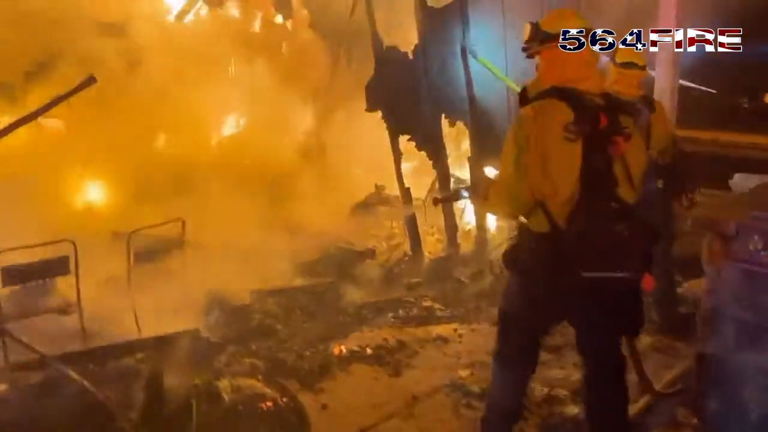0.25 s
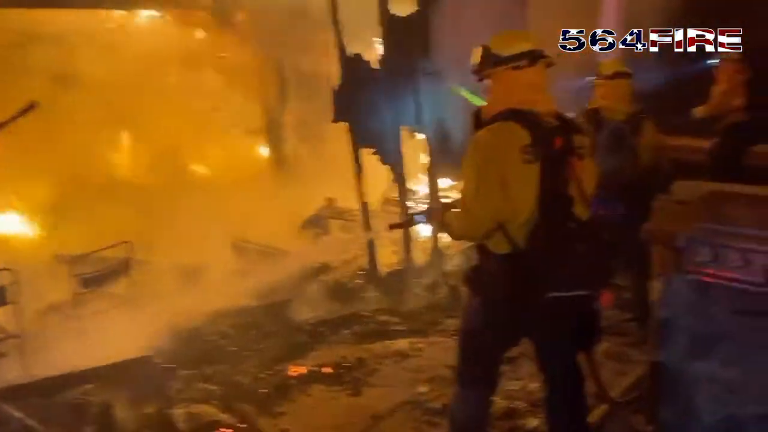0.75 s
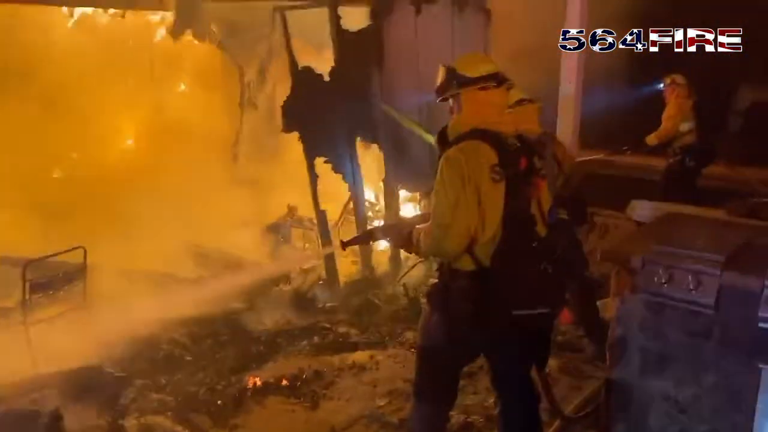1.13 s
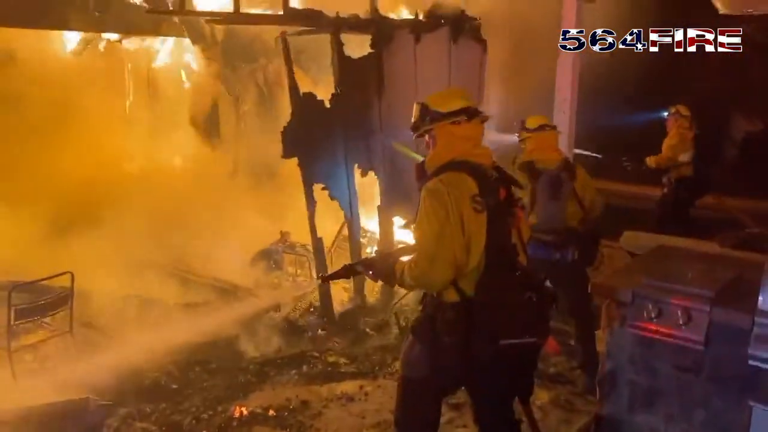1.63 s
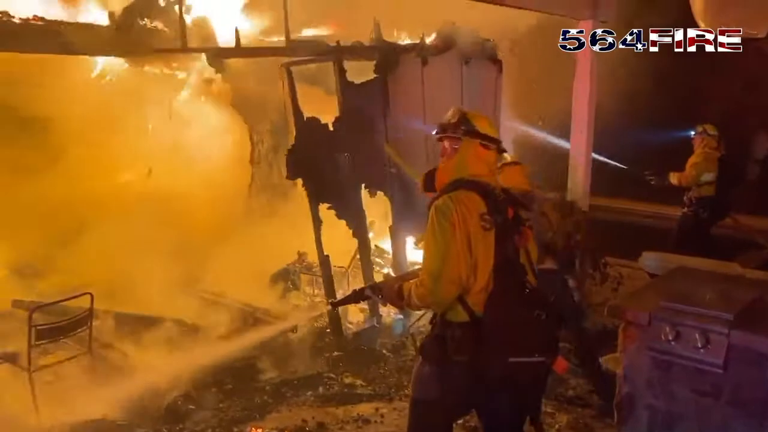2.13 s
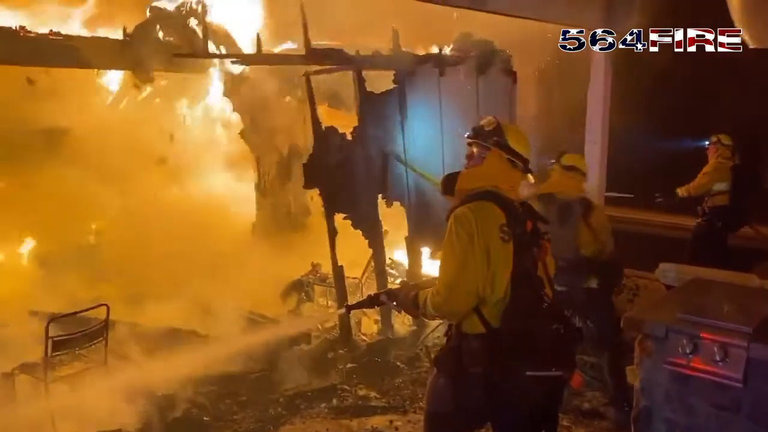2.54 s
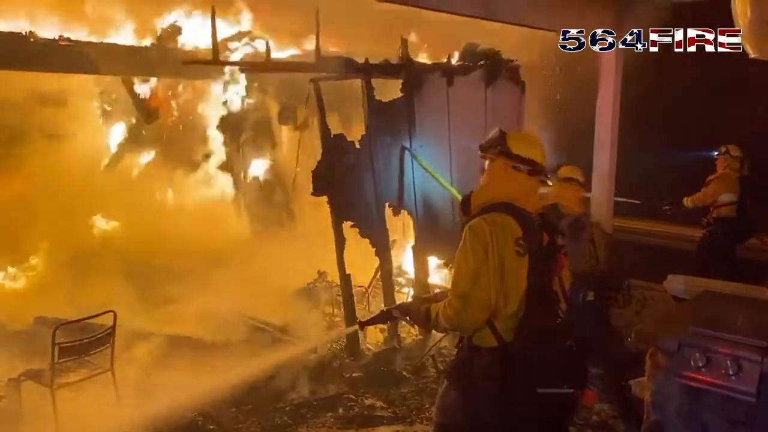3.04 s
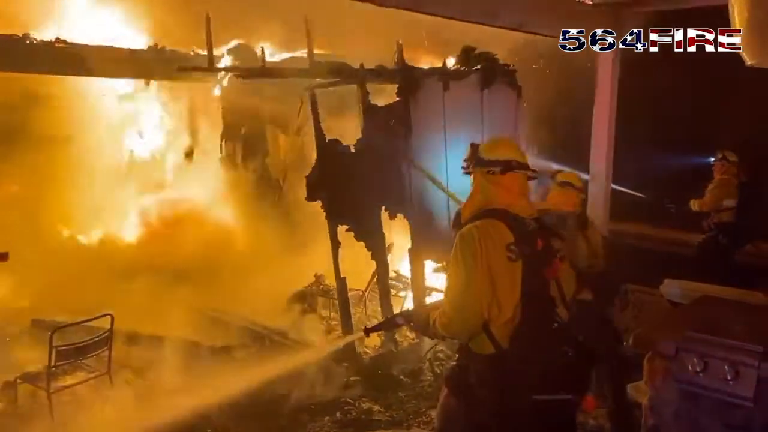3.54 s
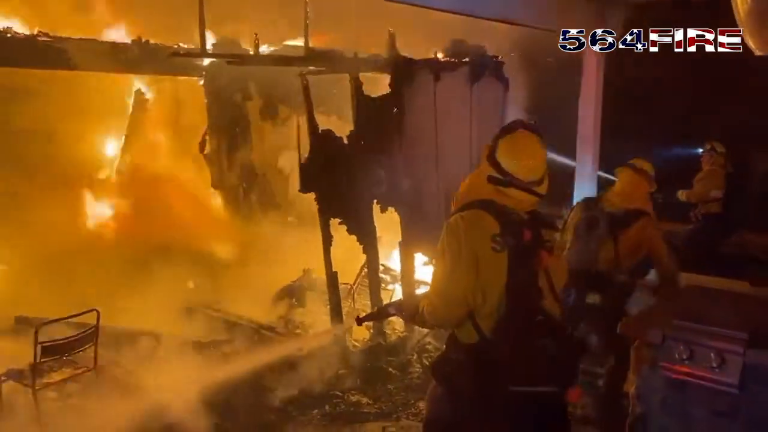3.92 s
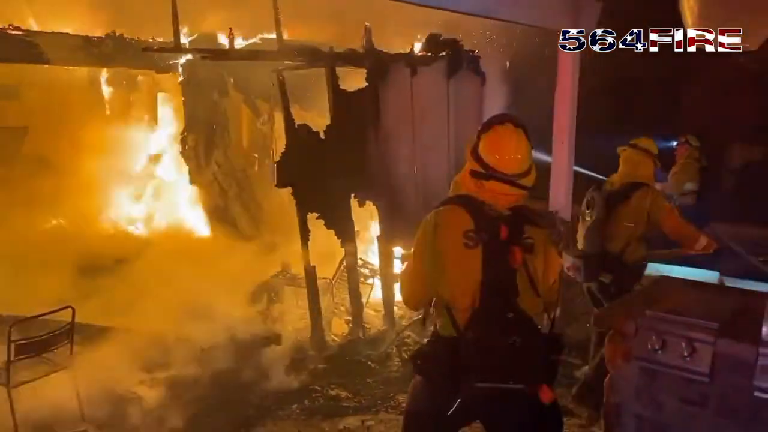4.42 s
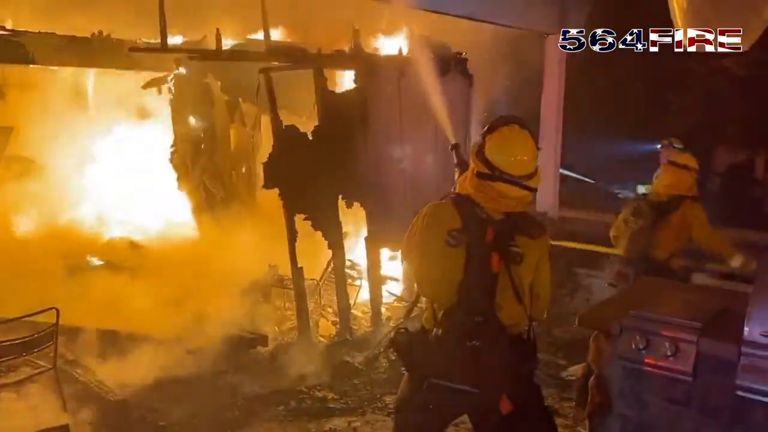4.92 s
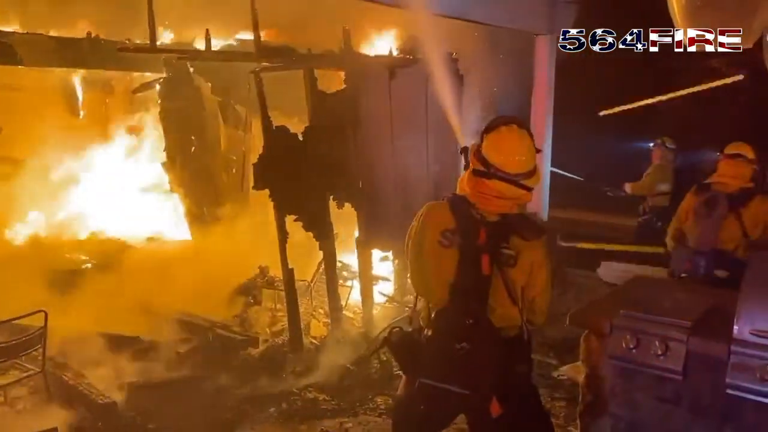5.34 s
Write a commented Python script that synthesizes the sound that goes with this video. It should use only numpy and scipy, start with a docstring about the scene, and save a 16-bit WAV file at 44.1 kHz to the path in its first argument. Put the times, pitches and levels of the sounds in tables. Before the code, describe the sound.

Sputtering water spray drums on a wall over rumbling, crackling fire and the steady drone of a distant pump engine.

```python
"""Fire hoses play on a burning building at night. From the start the near jet hisses at the nozzle,
spatters on debris and drums on a sheet wall, while flames roar and a small pump engine runs some way
off against a wash of farther hoses and fire. Big drops spit on hot debris and the fire crackles as the
jet is swung about. Near 3 s debris lands and tumbles; the jet surges, later drops away briefly, and
ends turned up at the roof. One microphone, band-limited."""
import sys
import numpy as np
from scipy import signal
from scipy.fft import rfft, irfft, next_fast_len
from scipy.io import wavfile
from scipy.ndimage import uniform_filter1d, map_coordinates

SR = 44100
rng = np.random.default_rng(int(sys.argv[2]) if len(sys.argv) > 2 else 0)


def generate_wav(signal):
    """Clip the signal to [-1, 1] and save it as 16-bit WAV at the path in sys.argv[1]."""
    frames = np.transpose(np.atleast_2d(signal))
    scaled = np.clip(frames, -1, 1) * 32767
    pcm = np.round(scaled).astype(np.int16)
    wavfile.write(sys.argv[1], SR, pcm)


N = 246078


def amp(db):
    """Gain of a level in dB."""
    return 10 ** (np.asarray(db) / 20)


def unit(x):
    """x at rms 1."""
    return x / np.sqrt(np.mean(x ** 2) + 1e-20)


def eq_gain(points, hz):
    """Gain of an EQ curve drawn through (freq_hz, level_db) points on a log axis."""
    freq_hz, level_db = np.transpose(points)
    return amp(np.interp(np.log(hz + 1), np.log(freq_hz + 1), level_db))


def automation(rows):
    """One per-sample curve for each column after the time."""
    time_s, *columns = np.transpose(rows)
    return [np.interp(np.arange(N) / SR, time_s, column) for column in columns]


def wobble(rate):
    """A smooth random curve, rate knots a second."""
    knots = rng.standard_normal(int(N * rate / SR) + 4)
    return map_coordinates(knots, [np.arange(N) * rate / SR])


def filtered(x, response):
    """x through a gain that depends on frequency."""
    size = next_fast_len(N + 8192)
    return irfft(rfft(x, size) * response(np.fft.rfftfreq(size, 1 / SR)), size)[..., :N]


def coloured(x, eq):
    """x shaped by an EQ curve that closes an octave past each end, at rms 1."""
    closed = [(eq[0][0] / 2, -120), *eq, (eq[-1][0] * 2, -120)]
    return unit(filtered(x, lambda hz: eq_gain(closed, hz)))


def water(patchy_db, drops_db):
    """White rush with patches of random gain, and single drops of very uneven size on top."""
    spectrum = signal.stft(rng.standard_normal(N), nperseg=512)[2]
    patches = uniform_filter1d(rng.standard_normal(spectrum.shape), size=8, axis=0)  # across frequency
    patches = uniform_filter1d(patches, size=5, axis=1)  # across time
    rush = signal.istft(spectrum * amp(patchy_db * unit(patches)), nperseg=512)[1][:N]
    drops = (rng.random(N) < 1500 / SR) * rng.standard_normal(N)  # about 1500 a second
    size_db = np.minimum(4 * rng.exponential(size=N), 8)
    return unit(rush) + amp(drops_db) * unit(drops * amp(size_db))


def bursts(rows, rise_cycles, decay_cycles):
    """Short pressure bursts: each a wave that swells and dies within a few cycles."""
    track, t = np.zeros(N + SR), np.arange(SR // 8) / SR
    for start_s, peak_db, pitch_hz in rows:
        cycles = pitch_hz * t - 2 * decay_cycles  # zero at the peak
        envelope = np.exp(-(cycles / np.where(cycles < 0, rise_cycles, decay_cycles)) ** 2)
        track[round(start_s * SR):][:len(t)] -= amp(peak_db) * envelope * np.cos(2 * np.pi * cycles)
    return track[:N]


# EQ of the hiss, the coarse spatter and the airy mist: freq_hz, relative_db
HISS_EQ = [(3600, -25.5), (4500, -2), (5700, 4.5), (6600, -0.5), (7500, -17.5), (8500, -45)]
SPATTER_EQ = [(2200, -6), (2700, -1.5), (3500, 0), (4300, -1.5), (5200, -12.5)]
MIST_EQ = [(6600, -1.5), (7500, 2), (8300, 4), (9000, 5.5), (9800, -22)]


def spray(spatter_db, mist_db):
    """The jet tears into drops: hiss, coarser spatter and fine mist."""
    torn = water(patchy_db=1.5, drops_db=-5.5)
    layers = [(0, HISS_EQ), (spatter_db, SPATTER_EQ), (mist_db, MIST_EQ)]
    return sum(amp(level_db) * coloured(torn, eq) for level_db, eq in layers)


# Midrange body of water drumming on the wall: freq_hz, relative_db
DRUM_EQ = [(450, -21), (650, -3), (800, 0), (1000, 1.5), (1300, 0.5), (1600, -1.5), (2200, -18.5)]


def drumming(drum_db, ring_db, ring_hz):
    """The jet drums on what it strikes and excites a hollow whose pitch shifts with the aim."""
    drum = coloured(water(patchy_db=1.6, drops_db=-4.5), DRUM_EQ)
    gush = np.array([water(patchy_db=1.0, drops_db=-8.5), water(patchy_db=0.51, drops_db=-5.5)])
    broad = unit(filtered(gush, lambda hz: 1 / np.sqrt(1 + (hz / 330) ** 3)))
    narrow = unit(filtered(gush, lambda hz: 1 / (1 + (hz / 210) ** 2)))
    focus = np.clip((ring_db + 29) / 12, 0, 0.5)  # a direct, loud hit rings more purely
    swell = (1 - focus) * broad + focus * narrow
    phase = 2 * np.pi * np.cumsum(ring_hz) / SR
    ring = swell[0] * np.cos(phase) + swell[1] * np.sin(phase)  # slow noise on the moving pitch
    return amp(drum_db) * drum + amp(ring_db) * ring


# Fader ride of the near jet: time_s, level_db
JET_FADER = [(0.0, -29.5), (0.1, -30.5), (0.16, -29.5), (0.19, -27.5), (0.24, -32), (0.31, -32),
             (0.42, -31.5), (0.49, -29.5), (0.54, -30), (0.6, -34), (0.635, -32.5), (0.655, -28.5),
             (0.71, -34.5), (0.73, -28.5), (0.79, -33), (1.0, -32.5), (1.33, -35), (1.44, -29),
             (1.58, -23.5), (1.66, -25.5), (1.74, -25), (2.1, -25), (2.2, -26), (2.4, -23), (2.53, -27),
             (2.62, -35), (2.8, -36), (2.95, -38), (3.1, -35.5), (3.2, -33), (3.3, -32), (3.4, -29.5),
             (3.5, -26.5), (3.56, -25.5), (3.59, -23.5), (3.615, -24), (3.645, -19), (3.67, -21.5),
             (3.69, -24), (3.73, -35), (3.85, -34), (4.0, -35), (4.08, -31), (4.16, -31.5), (4.21, -28),
             (4.3, -32), (4.44, -33.5), (4.58, -47.5), (4.805, -49), (4.812, -41), (4.824, -47),
             (4.83, -38.5), (4.85, -37), (4.92, -37), (4.98, -43), (5.06, -37), (5.32, -39), (5.58, -37.5)]
# Mix at each aim, relative to that fader: start_s, drum_db, ring_db, ring_hz, spatter_db, mist_db
NOZZLE_AIMS = [(0.0, 1.5, -1.5, 1950, -8.5, -4), (0.95, 3, 2, 1965, -7, -4), (1.409, -3, -2, 2030, -1, -9),
               (1.53, -4, 1.5, 2120, -2, -6.5), (1.65, -4, -2, 2090, -1.5, -5.5),
               (2.049, -8, -4, 2017, -3, -6.5), (2.581, 0.5, -1.5, 1930, -4.5, -7.5),
               (2.9, 1, 1, 1904, -6.5, -6), (3.15, -1, 1, 1874, -7.5, -6), (3.33, -3.5, 7, 1838, -10, -8),
               (3.43, 2.5, 3.5, 1900, -9, -11), (3.48, -2, 3, 1900, -7, -14),
               (3.52, 1, 0.5, 1830, -9.5, -10), (3.6, -2, -2, 1860, -8, -11),
               (3.67, -0.5, 0.5, 1680, -11, -11), (3.72, -0.5, -2, 1855, -11.5, -7.5),
               (4.03, -2.5, 0, 1783, -15, -9.5), (4.18, -4.5, -2, 1852, -18, -6.5),
               (4.27, -3, -19, 1880, -13, -6), (4.54, 8.5, -8, 1897, -17, 0), (4.815, 7, -2, 1967, -1, 7.5),
               (4.85, 3, 6, 1960, -1, 2.5), (4.88, 7, 4, 1900, 1, 3), (4.91, 0, 2, 1960, 1, 3.5),
               (4.94, 4.5, -6, 1980, -5, 2)]
SWING_S = 0.031  # glide from one aim to the next


def near_hose(sputter):
    """The nozzle swings from aim to aim; air in the hose makes spray and landing water sputter as one."""
    jet_db, = automation(JET_FADER)
    start_s, *columns = np.transpose(NOZZLE_AIMS)
    aim = np.maximum(np.searchsorted(start_s, np.arange(N) / SR, side="right") - 1, 0)
    drum_db, ring_db, ring_hz, spatter_db, mist_db = [
        uniform_filter1d(column[aim], size=round(SWING_S * SR), mode="nearest") for column in columns]
    landing = drumming(jet_db + drum_db, jet_db + ring_db, ring_hz)
    nozzle = amp(jet_db) * spray(spatter_db, mist_db)
    return amp(0.67 * sputter) * landing + amp(0.75 * sputter) * nozzle


# Fader rides of the fire's roar: time_s, rumble_db, flutter_db
FLAME_FADERS = [(0.0, -27.5, -25.5), (0.45, -27, -22.5), (0.75, -25, -21.5), (1.1, -25.5, -24),
                (1.3, -33, -22), (1.5, -25.5, -24), (1.65, -23.5, -23.5), (1.9, -22.5, -23),
                (1.98, -28, -24.5), (2.07, -27, -24), (2.15, -28, -30.5), (2.5, -30, -36), (2.7, -29, -31),
                (3.4, -28.5, -29.5), (3.62, -21.5, -25.5), (3.78, -29, -32.5), (4.0, -34.5, -28),
                (4.35, -34, -29.5), (4.75, -27, -29), (5.15, -31.5, -36.5), (5.35, -26, -30.5),
                (5.58, -33, -28.5)]
# EQ of the deep rumble and the low-mid flutter: freq_hz, relative_db
RUMBLE_EQ = [(13, -41), (22, -18), (42, -19), (59, -6.5), (90, -5.5), (173, -11.5), (210, -19.5),
             (220, -14), (290, -22.5), (480, -120)]
FLUTTER_EQ = [(76, -33), (130, -2.5), (178, 0.5), (210, -5), (252, -0.5), (410, -5.5), (590, -11.5),
              (800, -18.5), (1040, -38), (1760, -120)]


def flames():
    """Turbulent burning: a churning rumble under a lighter flutter."""
    rumble_db, flutter_db = automation(FLAME_FADERS)
    rumble = unit(amp(0.31 * wobble(6.7)) * coloured(rng.standard_normal(N), RUMBLE_EQ))
    flutter = unit(amp(0.72 * wobble(12)) * coloured(rng.standard_normal(N), FLUTTER_EQ))
    return amp(rumble_db) * rumble + amp(flutter_db) * flutter


# The engine hunts, ahead of or behind a steady beat: time_s, lead_s
ENGINE_TIMING = [(0.2, 0.014), (0.45, 0.0048), (0.7, 0.0009), (0.95, 0.0008), (1.2, 0.01), (4.2, 0.017),
                 (4.45, 0.002), (4.61, 0.00013), (4.85, -0.00074), (5.2, 0.004)]
# How loud the engine comes across: time_s, valve_db, exhaust_trim_db
ENGINE_FADERS = [(0, -38, -1), (0.5, -35, 0), (0.85, -34.5, 2), (1.1, -34, 0.5), (1.7, -34.5, 1.5),
                 (2.3, -46, -3.5), (3, -50, -1), (4, -47, -4), (4.4, -39, -0.5), (4.7, -37, -1.5),
                 (5.1, -36.5, -1), (5.58, -50, -4)]
# Partials of the exhaust drone, before the trim: shaft_multiple, level_db
EXHAUST_PARTIALS = [(1, -35), (1.5, -41.5), (2, -36.5), (2.5, -44.5), (3, -39.5), (4.5, -42), (5, -47),
                    (6, -48)]
# Fader ride of the hum: time_s, level_db
HUM_FADER = [(0, -35), (0.8, -32), (1.3, -38.5), (1.8, -35), (2.3, -40.5), (3.3, -35), (3.8, -39.5),
             (4.3, -35.5), (5.58, -36.5)]
# EQ of the valve rattle: freq_hz, relative_db
VALVE_EQ = [(600, -4), (1200, 0), (2000, 0), (2500, -1), (3000, -2), (3500, -7), (4200, -14), (6000, -12)]
SHAFT_HZ, HUM_HZ = 60.17, 240.8
FIRING_S = 4.6105  # one firing, which anchors the beat


def pump_engine():
    """A four-stroke single: exhaust drone, a hum, and valves rattling at each firing and a turn later."""
    t = np.arange(N) / SR - FIRING_S
    lead_s, = automation(ENGINE_TIMING)
    valve_db, trim_db = automation(ENGINE_FADERS)
    shaft = 2 * np.pi * SHAFT_HZ * (t + lead_s)
    exhaust = np.zeros(N)
    for multiple, level_db in EXHAUST_PARTIALS:
        gain = np.sqrt(2) * amp(level_db + trim_db + 3.0 * wobble(5))
        exhaust += gain * np.sin(multiple * shaft + 2 * np.pi * rng.random() + 0.4 * wobble(5.4))
    hum_db, = automation(HUM_FADER)
    hum_gain = np.sqrt(2) * amp(hum_db + 1.6 * wobble(5))
    hum = hum_gain * np.sin(2 * np.pi * HUM_HZ * t + 0.4 * wobble(3))
    cam = shaft / 2 + np.pi * SHAFT_HZ * 0.0008 * wobble(30)  # half speed, about 0.8 ms of jitter
    firing, offbeat = np.exp(3.5 * (np.cos([cam, cam + np.pi]) - 1))  # pulses several ms wide
    ticks = (firing + 0.3 * offbeat) * amp(1.5 * wobble(30))
    rattle = unit(ticks * coloured(rng.standard_normal(N), VALVE_EQ))
    return exhaust + hum + amp(valve_db) * rattle


# EQ of the background bed: freq_hz, relative_db
DISTANT_EQ = [(18, -47), (30, -7), (69, 2), (247, -8), (532, -5), (614, -9), (1090, -13.5), (2030, -8.5),
              (2800, -14), (3790, -23.5), (5840, -23), (7780, -22), (8560, -24.5), (9200, -47.5),
              (12000, -52), (20200, -120)]
DISTANT_DB = -28


def distant_wash():
    """Farther hoses and fire blur into one steady bed."""
    return amp(DISTANT_DB) * coloured(water(patchy_db=1.43, drops_db=-20.0), DISTANT_EQ)


# Bright spits of water: start_s, peak_db, pitch_hz
SPIT_HITS = [(0.1101, -16, 4330), (0.2623, -16, 5920), (0.3611, -12, 5520), (0.824, -14, 5623),
             (1.3987, -13, 4620), (3.1246, -20, 6240), (3.4467, -12, 4700), (4.2378, -15, 5820),
             (4.366, -24, 6620), (4.3954, -17, 5600), (4.811, -19, 3046), (4.8274, -20, 7620),
             (5.3677, -20, 5190)]


def spits():
    """Big drops burst on hot debris."""
    return bursts(SPIT_HITS, rise_cycles=0.5, decay_cycles=1.4)


# Dry snaps in the fire: start_s, peak_db, pitch_hz
CRACKLE_HITS = [(0.2844, -16, 2010), (0.3128, -15, 1980), (0.445, -16, 1600), (0.4879, -16, 1850),
                (0.531, -15, 1900), (0.6468, -12, 2370), (0.668, -15, 1500), (0.785, -17, 3000),
                (0.9828, -17, 1460), (1.0152, -16, 1800), (0.8494, -16, 2040), (0.9172, -15, 2300),
                (1.1716, -14, 2224), (1.2652, -7.5, 1400), (2.1085, -13, 2020), (3.3373, -17, 1774),
                (3.4166, -11, 1744), (3.476, -15, 1448), (3.5492, -10, 1230), (3.6147, -10, 1073),
                (3.6604, -14, 1852), (4.1929, -15, 1900), (4.4263, -17, 1730), (4.8429, -13, 1300),
                (4.8787, -17, 1500)]


def crackles():
    """The fire crackles in sharp pressure pops about a cycle long."""
    return bursts(CRACKLE_HITS, rise_cycles=0.25, decay_cycles=0.8)


# Low thuds of debris: start_s, peak_db, pitch_hz
THUD_HITS = [(2.88, -18.5, 61.3), (2.918, -19, 73), (2.928, -17.5, 215), (2.937, -16.5, 387),
             (2.944, -17, 290)]


def falling_debris():
    """Debris lands and tumbles in a quick run of soft-edged thuds."""
    return bursts(THUD_HITS, rise_cycles=1.3, decay_cycles=1.6)


def scene():
    """All sources at the one microphone, the same in both channels."""
    sputter = unit(0.3 * wobble(10) + 0.53 * wobble(16) + 0.77 * wobble(45))
    bed = distant_wash()
    mono = near_hose(sputter) + flames() + pump_engine() + bed + spits() + crackles() + falling_debris()
    return np.array([mono, mono])


# Steep high cut on the whole mix: freq_hz, gain_db
HIGH_CUT = [(9080, -1), (9140, -6), (9400, -28.5), (9600, -42), (9750, -75.5)]
BAND_LIMIT_HZ = 10417


def record(dry):
    """The treble falls steeply and nothing is kept above the band limit."""
    return filtered(dry, lambda hz: eq_gain(HIGH_CUT, hz) * (hz < BAND_LIMIT_HZ))


dry = scene()
out = record(dry)
generate_wav(out)
```